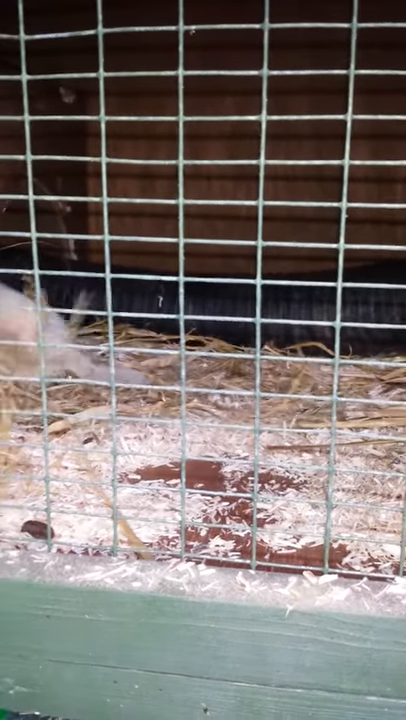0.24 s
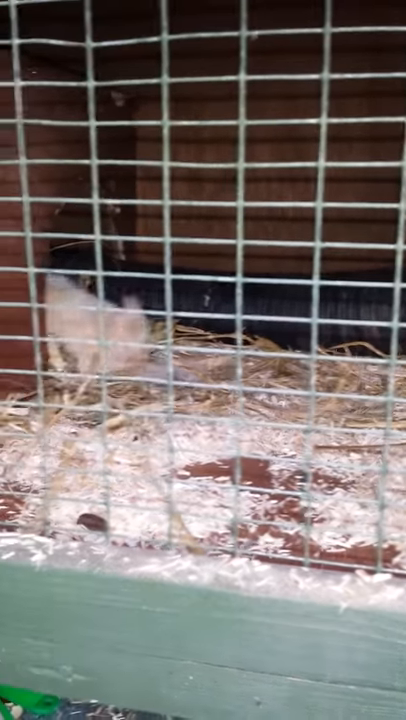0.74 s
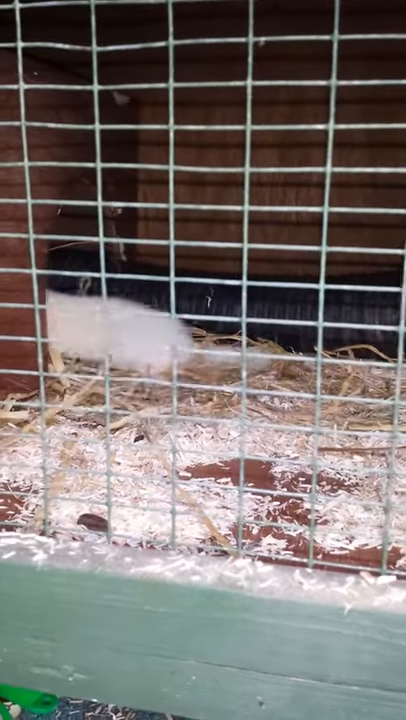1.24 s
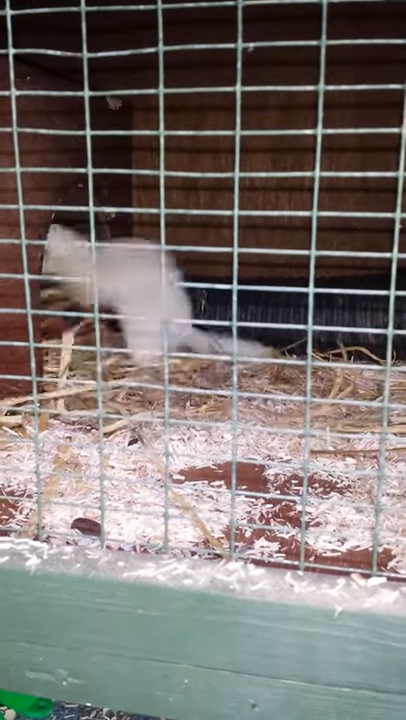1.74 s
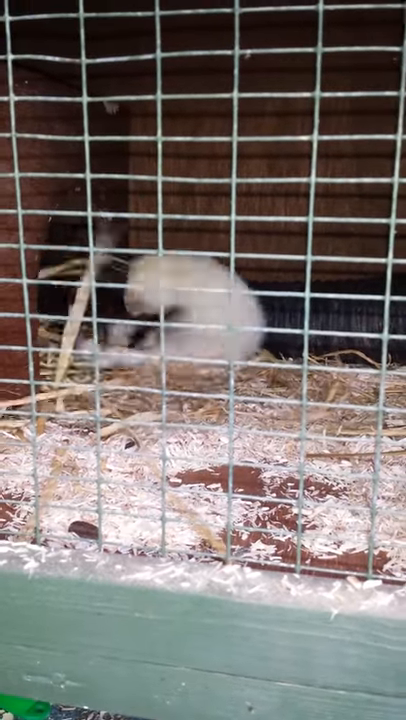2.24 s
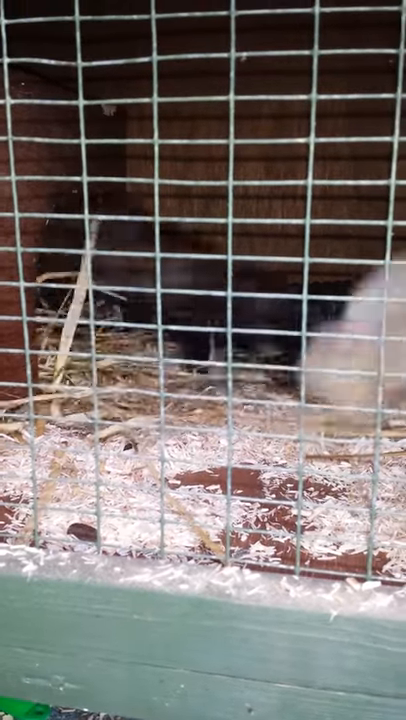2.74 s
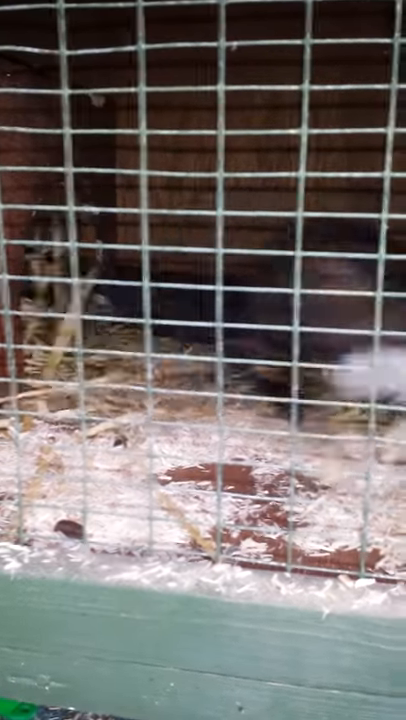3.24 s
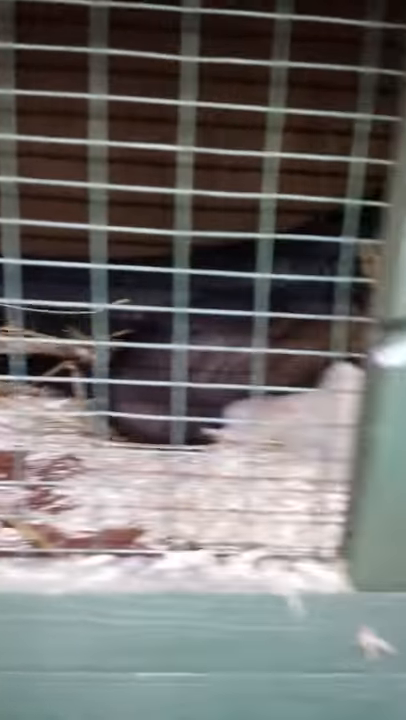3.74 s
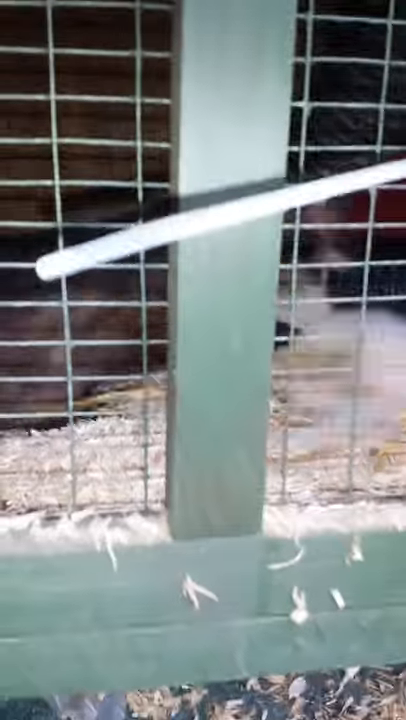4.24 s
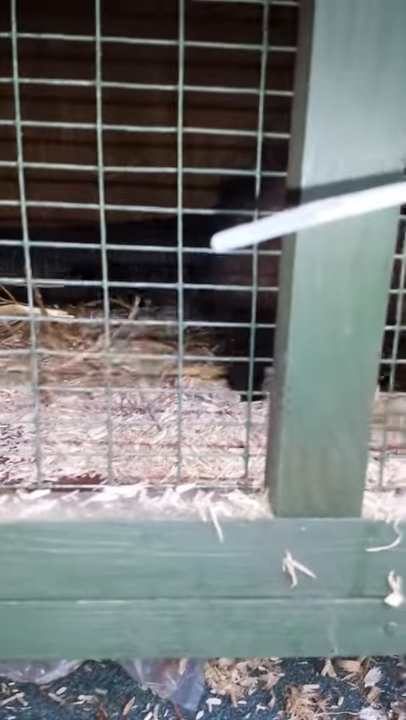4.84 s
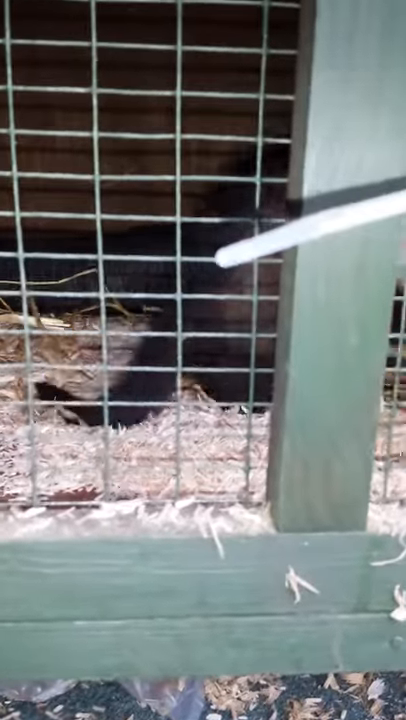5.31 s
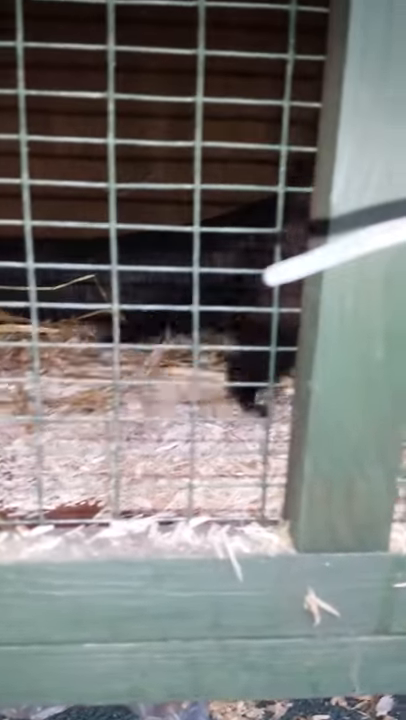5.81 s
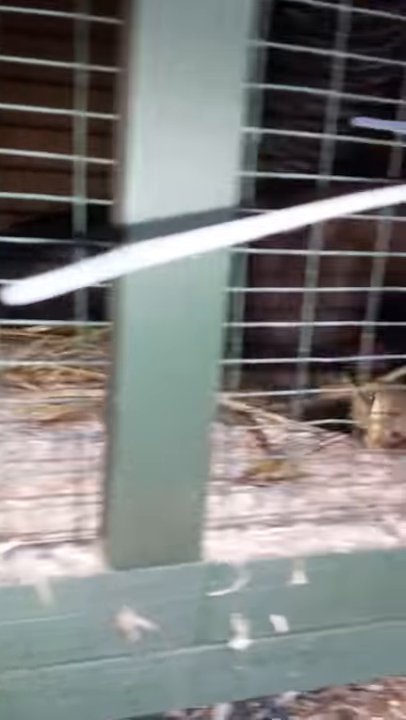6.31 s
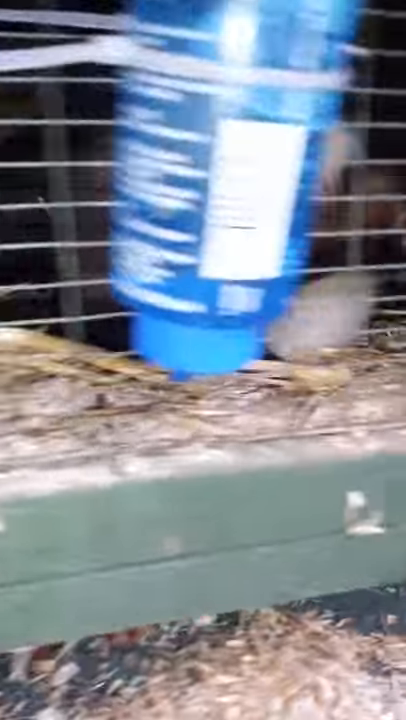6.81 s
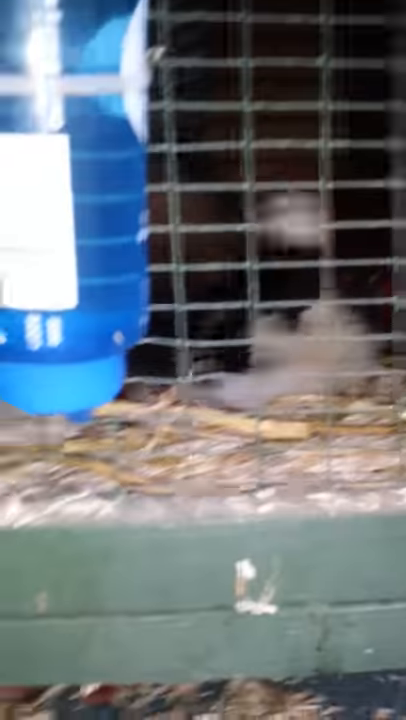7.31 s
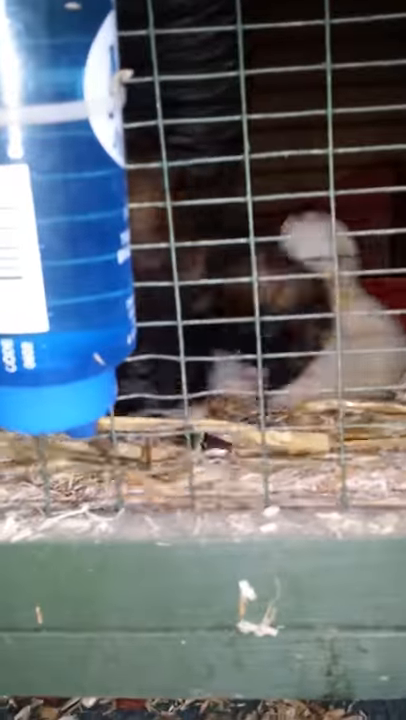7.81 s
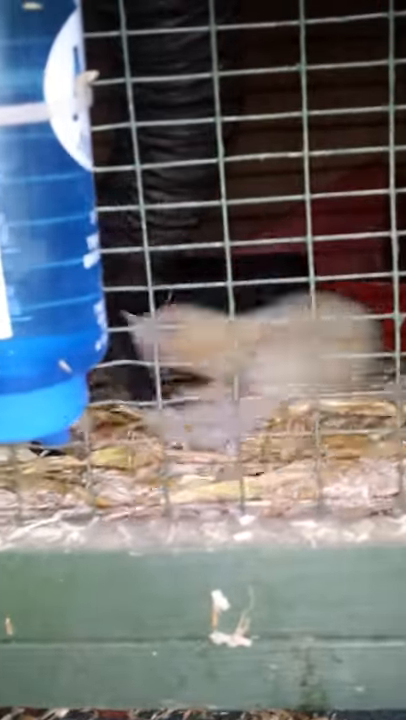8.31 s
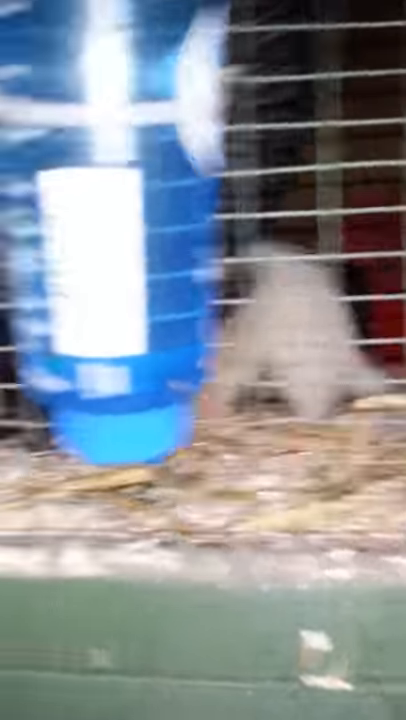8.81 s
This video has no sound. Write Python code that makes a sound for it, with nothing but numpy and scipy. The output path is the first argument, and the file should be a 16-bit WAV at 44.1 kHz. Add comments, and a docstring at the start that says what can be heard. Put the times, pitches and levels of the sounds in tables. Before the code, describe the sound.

Two ferret kits play-fight close by in a small wooden hutch. Quick, hoarse chuckling dooks come in bursts over continuous straw rustling and crackling, with sharp stalk snaps, dull body bumps and scuffing paws. A faint distant whistle sounds early and again later. A modest knock comes midway, two short claw scrapes on wire follow, and after the calls stop, the scuffle ends on a hard double knock. Quiet outdoor air lies behind.

```python
"""Two ferret kits wrestle in a wooden hutch bedded with straw and shavings, heard close by through the wire front.
From the start they chuckle in hoarse dooks, voiced puffs through a moving mouth, over straw made of tiny noisy slips.
A faint far whistle, a plain tone, sounds early and again later; stalks snap and bodies bump resonant boards.
Midway a hard knock rings the front; later a claw twice scrapes the wire, as noise through its damped modes.
The dooks stop before the end, the tussle goes on to two last, near-joined knocks; quiet outdoor air lies behind."""
import sys
import numpy as np
from scipy import signal
from scipy.fft import rfft, irfft
from scipy.io import wavfile
from scipy.ndimage import uniform_filter1d

SR = 44100
rng = np.random.default_rng(int(sys.argv[2]) if len(sys.argv) > 2 else 0)


def file_out(sig):
    """Save sig as 16-bit WAV at sys.argv[1]."""
    # one column per channel
    cols = np.atleast_2d(sig).T
    # limit, then scale
    lim = np.clip(cols, -1, 1)
    pcm = np.round(lim * 32767).astype(np.int16)
    wavfile.write(sys.argv[1], SR, pcm)


N = 399546
TIME = np.arange(N) / SR

# how hard the kits tussle between their big moves, ahead of the shuffle and scuff gains:
# time_s, straw_rustle_db, board_scuff_db
TUSSLE_COURSE = [(0.0, -39.5, -50), (0.58, -41, -44), (1.64, -39.5, -49), (1.87, -35.5, -67),
                 (2.27, -37.5, -61), (2.78, -34, -48), (3.25, -39, -37.5), (3.52, -41, -55),
                 (3.78, -51, -54.5), (4.11, -49, -51.5), (4.62, -35, -33.5), (4.92, -40.5, -40.5),
                 (5.2, -37.5, -37.5), (5.531, -43.5, -41.5), (5.98, -36.5, -36.5), (6.38, -35.5, -41),
                 (6.71, -45.5, -40), (7.16, -37.5, -40), (7.37, -43.5, -43), (8.35, -39, -44),
                 (8.81, -43, -42), (9.06, -37, -31)]


def from_db(db):
    """Decibels to amplitude gain."""
    return 10 ** (np.asarray(db) / 20)


def rms_one(x):
    """Scale to unit rms."""
    return x / np.sqrt(np.mean(x ** 2) + 1e-20)


def at_hz(points, hz):
    """Read a curve of (Hz, value) points on a log-frequency axis."""
    points = np.array(points)
    return np.interp(np.log(hz), np.log(points[:, 0]), points[:, 1])


def cut(x, hz, kind, order=2):
    """Butterworth filter."""
    sos = signal.butter(order, np.clip(hz, 10, .45 * SR), kind, fs=SR, output="sos")
    return signal.sosfilt(sos, x + 1e-18)


def resonate(x, hz, width_hz):
    """One two-pole resonance, gain about 1 on top."""
    r = np.exp(-np.pi * width_hz / SR)
    zeros = np.array([1, 0, -1]) * (1 - r * r) / 2
    poles = [1, -2 * r * np.cos(2 * np.pi * hz / SR), r * r]
    return signal.lfilter(zeros, poles, x + 1e-18)


def glide(x, hz, width_hz):
    """A resonance whose centre moves: shift it to zero, smooth with a double pole, shift back; unit rms."""
    turn = np.exp(2j * np.pi * np.cumsum(hz) / SR)
    r = np.exp(-2 * np.pi * width_hz / SR)
    return rms_one(np.real(turn * signal.lfilter([1], [1, -2 * r, r * r], x / turn)))


def drift(rate_hz):
    """A random curve of unit rms, joined from 2 * rate_hz random points a second."""
    knots = rng.standard_normal(4000)
    return rms_one(np.interp(TIME * 2 * rate_hz, np.arange(len(knots)), knots))


def add(track, s, sound):
    """Mix a sound into a track from time s on."""
    i = max(round(s * SR), 0)
    track[..., i:i + sound.shape[-1]] += sound[..., :max(N - i, 0)]


def coloured(spectrum, excite, patchy_db):
    """Half-octave stereo bands of an excitation, each with its own level, flicker and likeness."""
    # how alike left and right are: frequency_hz, likeness (0 unrelated, 1 the same)
    ear_likeness = [(30,0.39),(100,1),(400,0.56),(800,0.068)]
    lowest_hz = spectrum[0][0]
    edges = np.geomspace(lowest_hz, 16000, 2 * round(np.log2(16000 / lowest_hz)) + 1)
    out = 0
    for k, (low, high) in enumerate(zip(edges, edges[1:])):
        mid, side = cut(excite[k % 2], [low, high], "band")
        hz = np.sqrt(low * high)
        alike = np.clip(at_hz(ear_likeness, hz), -1, 1)
        gain = from_db(at_hz(spectrum, hz) + patchy_db * drift(25))
        out = out + gain * (np.sqrt(1 + alike) * mid + np.sqrt(1 - alike) * side * [[1], [-1]])
    return rms_one(out)


def dooks(jitter=0.121, shimmer=0.95, hiss_db=-14, arch_share=0.241, fall_share=0.045,
          lower_width_hz=170, upper_width_hz=280):
    """Short, evenly held voiced puffs with arching pitch and mouth; rough ones rasp with uneven cycles."""
    # each dook: middle_s, length_s, level_db, base_pitch_hz, upper_mouth_resonance_hz,
    # upper_resonance_db (relative to the lower one)
    dook_events = [(0.063,.03,-43.5,346,1400,-5),(0.222,.028,-44.5,372,1470,-3),(0.286,.034,-43.5,334,1380,-2),(0.375,.052,-42,373,1100,-2),(0.468,.05,-39.5,372,1100,-10),
                   (0.562,.028,-38.5,345,1030,-1),(0.584,.034,-38,365,1100,-19),(0.724,.036,-39,366,1340,-7),(0.861,.06,-40,331,1380,-8),(0.934,.038,-39,368,1470,-5),
                   (1.006,.04,-41,321,1360,-14),(1.125,.04,-39.5,380,1530,-5.5),(1.209,.03,-39.5,347,1380,-7),
                   (1.876,.038,-36.5,378,1100,1),(2.356,0.06,-34.5,351,1420,2),(2.452,.045,-45,398,1250,-1),(2.604,0.056,-33.5,388.4,1240,2),(2.769,.028,-36.5,309,900,-5),(2.824,.042,-35.5,309.5,890,-26),
                   (3.795,.034,-47.5,387,1380,7),(3.898,.065,-47,341,1350,1),(4.84,.034,-33.5,334,950,-2),(4.94,.032,-29,365,1050,3.5),(5.056,.026,-37.5,312,930,7),(5.085,.036,-35.5,306.6,1060,-2),(5.165,.025,-36.5,321,1150,-1),
                   (5.229,.034,-39,303,960,-5),(5.322,.03,-35,311,920,1),(5.504,.042,-35.5,364.5,1370,-3.5),(5.762,0.044,-36.5,310,1000,-10),(6.076,.04,-36,400,1250,-5),
                   (6.485,.04,-41.5,359,1260,1),(6.802,.047,-38.5,392.5,1270,2),(7.019,.048,-42,332,1300,-3),(7.117,.022,-35,330,1110,-4),(7.259,.036,-41,396,1240,8),(7.334,.03,-39.5,306,910,-13)]
    # hoarseness and chest tone through the fight: time_s, roughness (0-1), fundamental_db
    voice_course = [(1.2,0.3,-24),(2.35,0.69,-16),(3.9,0.48,-13),(4.94,0.5,2.5),(5.5,0.6,-1),(7.3,0.46,-3)]
    # the mouth opens and shuts in each dook: its resonances are lower at the ends, and sink throughout
    mouth_arch_share, mouth_fall_share = 0.085, 0.074
    hold_power = 2.5   # how squarely a dook holds its level between onset and end
    out, wobble, flutter, breath = np.zeros(N), drift(150), drift(120), rng.standard_normal(N)
    hiss = rms_one(resonate(resonate(breath, 6000, 4000), 6000, 4000))
    when, roughness, chest_db = np.transpose(voice_course)
    for s, length, db, pitch, upper_hz, upper_db in dook_events:
        u = np.linspace(-1, 1, round(length * SR))   # onset to end
        start = int(np.clip((s - length / 2) * SR, 0, N - len(u)))
        here = slice(start, start + len(u))
        hoarse = np.clip(np.interp(s, when, roughness), .1, .9)

        arch = 1.02 - arch_share * u ** 2 - fall_share * u
        phase = 2 * np.pi * np.cumsum(pitch * (arch + jitter * hoarse * wobble[here])) / SR
        harmonics = sum(np.cos(k * phase) for k in range(1, 7))
        folds = harmonics * np.exp(shimmer * hoarse * flutter[here])
        # breath noise pulses with the vocal folds
        rasp = rms_one(cut(breath[here], 2000, "low")) * (1 + np.cos(phase) / 2)
        source = rms_one(folds) + hoarse * rasp

        mouth = 1 - mouth_arch_share * u ** 2 - mouth_fall_share * u
        lower = glide(source, 2 * pitch * mouth, lower_width_hz)   # an octave above the base pitch
        upper = from_db(upper_db) * glide(source, upper_hz * mouth, upper_width_hz)
        chest = from_db(np.interp(s, when, chest_db)) * rms_one(resonate(source, 365, 70))
        voice = cut(lower - upper, 590, "high") + chest
        # level the voice over 1/70 s, so that the envelope alone shapes the puff
        voice = voice / np.sqrt(uniform_filter1d(voice ** 2, size=SR // 70) + 1e-9)
        voice = voice + from_db(hiss_db) * hiss[here]
        add(out, s - length / 2, from_db(db) * voice * (1 - np.abs(u) ** hold_power))
    return out


def straw_level():
    """Fidgety shuffling, with a swell for every sweep of a body; powers add."""
    # a body sweeping through the straw: middle_s, length_s, peak_level_db
    sweep_events = [(0.204,0.14,-35.5),(0.561,0.096,-32),(1.295,0.2,-35.5),(1.872,0.26,-31.5),(2.358,0.093,-30),(2.526,0.086,-29),
                    (2.677,0.044,-25.5),(2.853,0.16,-26),(3.004,0.2,-25),(3.248,0.061,-27.5),(3.303,0.066,-25),(3.93,0.061,-39.5),(4.276,0.23,-36.5),(4.522,0.2,-29),(4.67,0.1,-30.5),
                    (5.08,0.12,-39),(5.668,0.087,-32),(5.845,0.16,-27),(6.07,0.08,-29),(7.034,0.054,-30),
                    (7.658,0.095,-31),(7.766,0.047,-33),(8.887,0.085,-29.5),(8.999,0.047,-26.5)]
    shuffle_db = 2   # gain of the shuffling
    fidget_db, fidget_hz = 2.08, 6.5   # small moves make the shuffling swell at random
    s, straw_db, _ = np.transpose(TUSSLE_COURSE)
    shuffle = np.interp(TIME, s, straw_db) + shuffle_db + fidget_db * drift(fidget_hz)
    power = from_db(shuffle) ** 2
    for s, length, db in sweep_events:
        add(power, s - length / 2, from_db(db) ** 2 * np.hanning(round(length * SR)))
    return np.sqrt(power)


def rustle(grains_per_s=1500, hiss_db=2, clump_db=1.15, patchy_db=1.5):
    """Stalks slide over each other and crackle in clumps of tiny slips."""
    # straw colour: frequency_hz, level_db (per Hz, relative)
    straw_spectrum = [(400,-8),(1000,-4),(1700,-9),(2600,-6.5),(4000,-3.5),(5500,-3),(7000,4),(10000,-5.5),(14500,-12)]
    sizes = from_db(5.5 * np.minimum(rng.exponential(1, N), 3))
    grains = sizes * (rng.random(N) < grains_per_s / SR)
    slips = signal.lfilter([1], [1, -np.exp(-1 / (.0008 * SR))], grains + 1e-18)   # each fades in 0.8 ms
    strength = np.sqrt(rms_one(slips) ** 2 + from_db(hiss_db) ** 2) * from_db(clump_db * drift(40))
    return coloured(straw_spectrum, strength * rng.standard_normal((2, 2, N)), patchy_db)


def crackle(ticks_per_s=190, level_db=-10.0, size_db=3.3, width_hz=420, low_hz=3200, high_hz=8500, count=14):
    """Thin stalks and shavings flick past each other, each ringing briefly at one of several pitches."""
    sizes = from_db(size_db * np.minimum(rng.exponential(1, N), 3))
    ticks = (rng.random(N) < ticks_per_s / SR) * sizes
    dealt, out = rng.integers(0, count, N), 0
    for k, hz in enumerate(np.geomspace(low_hz, high_hz, count)):
        out = out + resonate(ticks * (dealt == k), hz, width_hz) * np.array([[1], [(-1) ** k]])
    return from_db(level_db) * rms_one(out)


def snaps(width_hz=3000, tail_db=-7, break_s=0.0033):
    """A stalk splinters with a sharp crack, then a dying run of fibre cracks rings in its hollow stem."""
    # each snap: start_s, ring_level_db (before the fade), ring_hz
    snap_events = [(.428,-30,5030),(1.8073,-23.5,5900),(1.857,-25,5900),(1.8822,-15,6400),(1.93,-31,6100),(2.117,-21.5,7000),(2.526,-31,6000),(2.631,-23,5800),(2.785,-16,7000),(3.043,-19.5,5830),
                   (3.197,-24.5,6000),(3.2925,-25.5,4730),(3.336,-16.5,6300),(3.3414,-11,6200),(3.449,-24,6300),(3.827,-47,10000),(4.018,-38,5760),
                   (4.403,-22,7300),(4.422,-22.5,7340),(4.7426,-11,5900),(5.372,-27,8240),(5.708,-29,8200),(6.244,-27,5900),(6.3424,-20.5,6330),(6.473,-22.5,6800),(6.531,-30,6500),(6.617,-24.5,9200),
                   (7.611,-25.5,5460),(8.685,-30.5,5500),(8.981,-26,6150),(9.024,-19,5850)]
    # bright splintering relative to the ring, and its ceiling: thick stalks only ring louder
    splinter_db, splinter_most_db = -2, -22.5
    tail_t60_s = 0.15
    out, t = np.zeros((2, N)), TIME[:SR // 6]
    shape = np.exp(-(t / break_s) ** 2) + from_db(tail_db - 60 * t / tail_t60_s)
    for s, db, hz in snap_events:
        fibres, splinters = rng.standard_normal((2, 2, len(t)))
        ring = from_db(db) * rms_one(cut(fibres, [hz - width_hz / 2, hz + width_hz / 2], "band"))
        bright_gain = from_db(min(db + splinter_db, splinter_most_db))
        splinters = bright_gain * cut(splinters, 2600, "high", order=1)
        add(out, s, (ring + splinters) * shape)
    return out


def rubs(width_hz=1700, catch_db=1.0):
    """A stalk catches and slips along its neighbour; the fast stutter rings in its hollow stem."""
    # each rub: middle_s, length_s, level_db (before the swell), ring_hz
    rub_events = [(0.154,0.094,-32,5940),(1.988,0.053,-25,5470),(3.018,0.043,-16.5,5000)]
    out = np.zeros((2, N))
    friction = rng.standard_normal((2, N)) * from_db(catch_db * drift(300))
    for s, length, db, hz in rub_events:
        n = round(length * SR)
        stutter = friction[:, round(s * SR):][:, :n]
        ring = resonate(resonate(stutter, hz, width_hz), hz, 2 * width_hz)
        add(out, s - length / 2, from_db(db) * rms_one(ring) * np.sqrt(np.hanning(n)))
    return out


def boards(force):
    """The floor boards answer a force with their broad modes, in alternating polarity."""
    # hutch boards: mode_hz, width_hz, level_db
    board_modes = [(67,32,4.5),(119,49.5,6.5),(174,84,1.5),(259,50,3),(328,64,0),(446,113,-4),(561,254,-5.5),(906,223,-5),(1080,345,-8.5),(2150,7500,-17.5)]
    return sum((-1) ** k * from_db(db) * resonate(force, hz, width)
               for k, (hz, width, db) in enumerate(board_modes))


def bumps(tumble_s=0.032, spread=0.65, push_db=-4):
    """A body lands with a push, a clack of wood and a short tumble, then settles; bony contacts sound higher."""
    # bodies and paws on the boards: start_s, thud_level_db, contact_pitch_hz
    bump_events = [(1.487,-35,125),(1.535,-32.5,95),(2.541,-41,229),(2.711,-30.5,186),(2.795,-37.5,260),(2.89,-33.5,219),(3.295,-31.5,259),(3.354,-27,100),(3.385,-32,80),
                   (3.898,-41.5,196),(4.213,-36.5,400),(4.774,-29,233),(5.68,-37,272),(5.713,-40,318),(5.82,-43,260),(5.848,-37,288),(6.1,-36,250),(6.174,-30,155),
                   (6.757,-43,120),(7.083,-38.5,345),(7.246,-36.5,280),(7.587,-25.5,210),(7.641,-33,620),(7.658,-33,196),(7.675,-39,135),
                   (8.015,-39,260),(8.332,-31.5,124),(8.506,-34,65),(8.689,-38.5,305),(8.959,-29.5,190),(8.994,-35,110)]
    # the rest of the body follows, softer and lower
    settle_s, settle_db, settle_pitch_share = .035, -8, 0.53
    # the clack grows with the blow: its level beside the thud at a -30 dB blow, and its rise per dB
    clack_db, clack_per_db, clack_hz, clack_s = -13, 0.7, 1300, 0.027
    out, t = np.zeros(N), TIME[:SR // 4]
    settles = [(s + settle_s, db + settle_db, hz * settle_pitch_share) for s, db, hz in bump_events]
    for s, db, hz in list(bump_events) + settles:
        force, grit = rng.standard_normal((2, len(t)))
        force *= np.exp(-t / tumble_s)
        force[0] += 48   # the first push
        push = resonate(force, hz, spread * hz)
        thud = boards(push) + from_db(push_db) * cut(push, 2 * hz, "low")
        thud = thud / np.std(thud[:SR // 40])
        clack = rms_one(cut(resonate(grit, clack_hz, clack_hz), 2 * clack_hz, "low")) * np.exp(-t / clack_s)
        hardness_db = db + 30
        clack_gain = from_db(clack_db + clack_per_db * hardness_db)
        add(out, s, from_db(db) * (thud + clack_gain * clack))
    return out


def scuffing(pats_per_s=200, size_db=1.5, low_hz=110):
    """Paws and flanks patter and drag over the boards: random taps plus steady noise as the force."""
    sizes = from_db(size_db * np.minimum(rng.exponential(1, N), 2))
    pats = (rng.random(N) < pats_per_s / SR) * sizes * rng.choice([-1, 1], N)
    force = rms_one(pats) + 1.02 * rng.standard_normal(N)
    return rms_one(cut(boards(force), low_hz, "high", order=1))


def floor_scuffs(sweep):
    """Scuffing that follows the tussle; every sweep through the straw also drags on the wide floor."""
    scuff_gain_db, drag_db = -2.5, -12.5
    s, _, scuff_db = np.transpose(TUSSLE_COURSE)
    paws = from_db(np.interp(TIME, s, scuff_db) + scuff_gain_db)
    level = np.hypot(paws, from_db(drag_db) * sweep)
    return level * (scuffing() + from_db(-8.5) * scuffing() * [[1], [-1]])


def knock():
    """Each hard contact sets the hutch front ringing in decaying sine modes."""
    # hard knocks on the hutch front: start_s, peak_level_db
    knock_events = [(4.221,-22.5),(9.0275,-9),(9.0315,-4.5)]
    # modes of the front: mode_hz, level_db (relative), t60_s
    front_modes = [(220,-2.5,0.25),(284,-3,0.16),(413,-2.5,0.088),(620,2.5,0.1),(775,9.5,0.079),(900,5,0.065),(1190,-8,0.082)]
    out, t = np.zeros(N), TIME[:SR // 4]
    ring = sum(from_db(db - 60 * t / t60) * np.sin(2 * np.pi * hz * t) for hz, db, t60 in front_modes)
    for s, db in knock_events:
        add(out, s, from_db(db) * ring / np.abs(ring).max())
    return out


def wire(rattle_db=4, rattle_hz=150):
    """A claw's rough, fading scrape excites the damped modes of the wire mesh."""
    # each scrape: start_s, length_s, level_db (before the fade)
    scrape_events = [(6.344, 0.1, -28), (6.475, 0.12, -33)]
    # the wire front: mode_hz, width_hz, level_db (relative)
    mesh_modes = [(2370,220,-2),(3260,860,-4),(4280,430,2),(5020,400,2),(6200,690,-1)]
    out, rattle = np.zeros((2, N)), from_db(rattle_db * drift(rattle_hz))
    for s, length, db in scrape_events:
        n = round(length * SR)
        friction = rng.standard_normal((2, SR))[:, :n] * rattle[round(s * SR):][:n]
        ring = sum(from_db(level) * resonate(friction, hz, width) for hz, width, level in mesh_modes)
        add(out, s, from_db(db) * rms_one(ring) * np.cos(np.linspace(0, np.pi / 2, n)))
    return out


def hutch(x, wet_db, bass_spread_db=-0.5):
    """Dense, short reflections between the wooden walls; their bass is partly shared by both ears."""
    t60_s = 0.058
    t = TIME[:SR // 5]
    tails = rng.standard_normal((3, len(t))) * from_db(-60 * t / t60_s) * (t > .001)
    bass = cut(tails[0] + from_db(bass_spread_db) * tails[1:], 700, "low")
    tails = bass + cut(tails[1:], 380, "high")
    tails /= np.sqrt(np.sum(tails ** 2, axis=1, keepdims=True))
    return x + from_db(wet_db) * signal.fftconvolve(np.atleast_2d(x), tails, axes=1)[:, :N]


def whistles():
    """A plain, far-off tone that swells and fades."""
    # each whistle: middle_s, length_s, peak_level_db, pitch_hz
    whistle_events = [(1.208,0.19,-47.5,1093),(3.763,0.25,-56.5,1076)]
    out = 0
    for s, length, db, hz in whistle_events:
        swell = np.exp(-(2 * (TIME - s) / length) ** 4)
        out = out + from_db(db) * swell * np.sin(2 * np.pi * hz * TIME)
    return out


def air():
    """Quiet outdoor air: steady noise, heaviest in the bass, flickering band by band."""
    # air colour: frequency_hz, level_db (per Hz, relative)
    air_spectrum = [(20,-2.5),(70,-0.5),(250,-8.5),(900,-16),(2000,-21),(5500,-14),(14000,-27.5)]
    return from_db(-47) * coloured(air_spectrum, rng.standard_normal((2, 2, N)), patchy_db=3.5)


def scene():
    """The kits, the bedding and the boards inside the hutch, and the air outside."""
    voices = hutch(dooks(), wet_db=-7)
    sweep = straw_level()
    straw = sweep * rms_one(hutch(rustle() + crackle(), wet_db=-9))
    cracks = hutch(snaps(), wet_db=-8)
    scuffs = floor_scuffs(sweep)
    wood = hutch(cut(bumps() + knock(), 50, "high"), wet_db=-10)
    return voices + straw + cracks + rubs() + scuffs + wood + wire() + whistles() + air()


def record(dry, shelf_hz=8000, left_db=-7, right_db=2.0, port_hz=4700, port_db=1.7, left_lag_s=.00006):
    """The left microphone hears later, keener at its port and duller on top; peaks round, the very top is cut."""
    cutoff_hz = 14700
    hz = np.arange(N + 1) * SR / (2 * N)
    top = 1 / (1 + (shelf_hz / (hz + 1)) ** 12)
    port = np.exp(-(2 * np.log2((hz + 1) / port_hz)) ** 2)
    # rows: left, right
    colour = from_db(top * np.array([[left_db], [right_db]]) + port * port_db * [[1], [-1]])
    colour = colour * np.exp(-2j * np.pi * hz * np.array([[left_lag_s], [0]]))
    steep = 1 / np.sqrt(1 + (hz / cutoff_hz) ** 260)
    rounded = .85 * np.tanh(dry / .85)
    return irfft(rfft(rounded, 2 * N) * colour * steep)[:, :N]


dry = scene()
out = record(dry)
file_out(out)
```